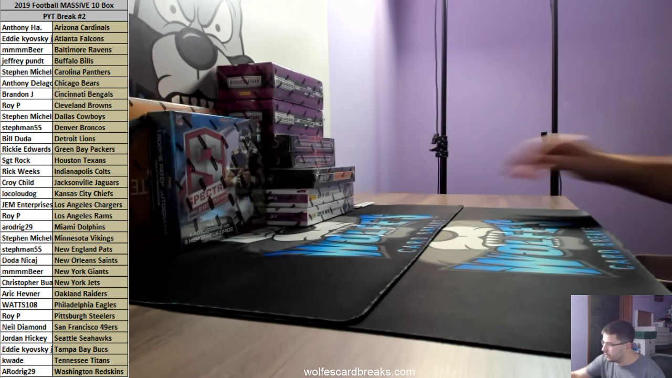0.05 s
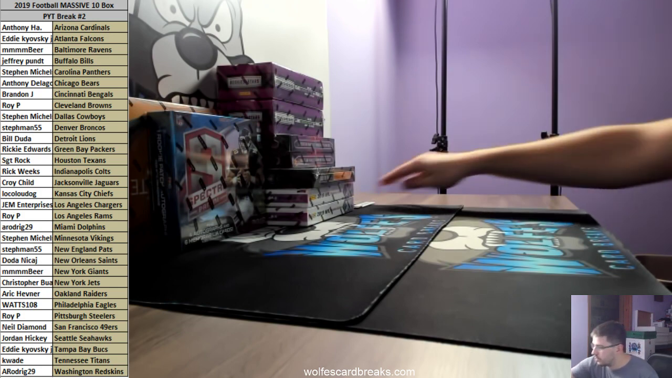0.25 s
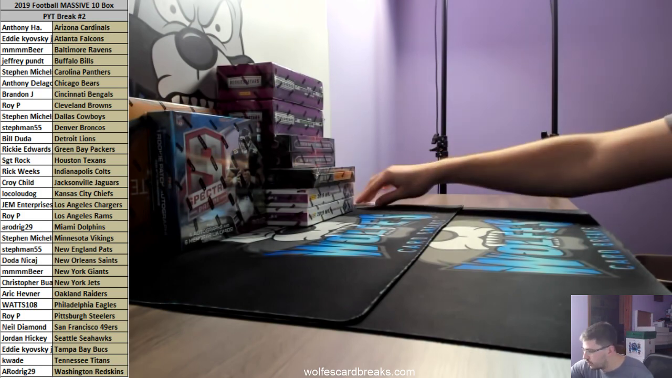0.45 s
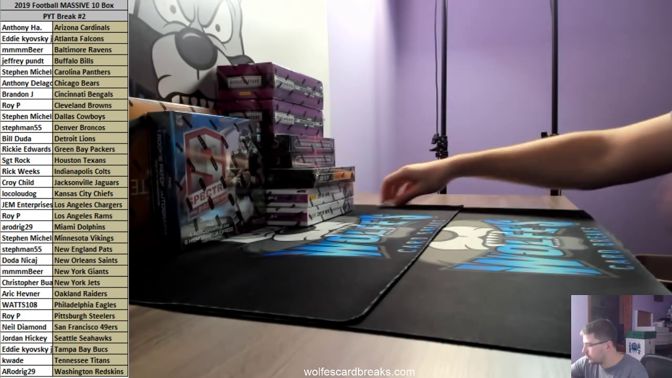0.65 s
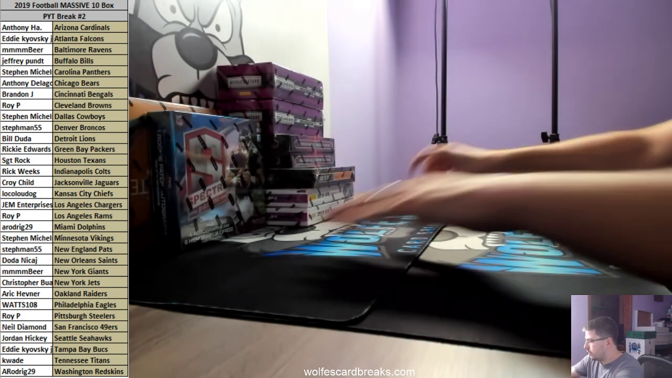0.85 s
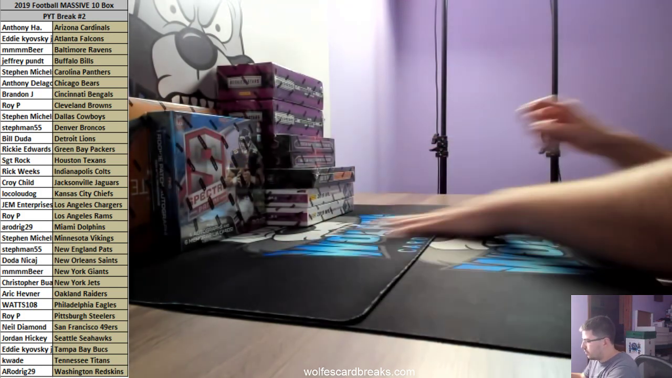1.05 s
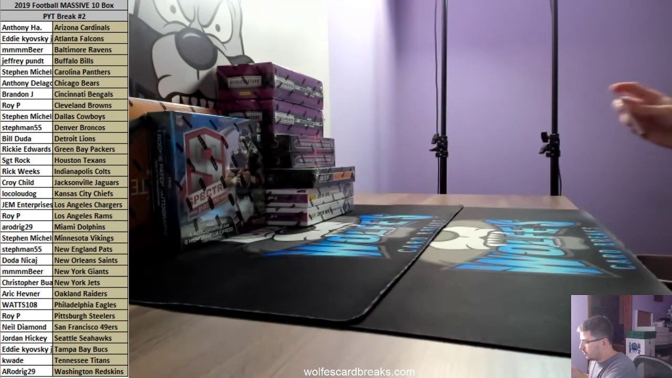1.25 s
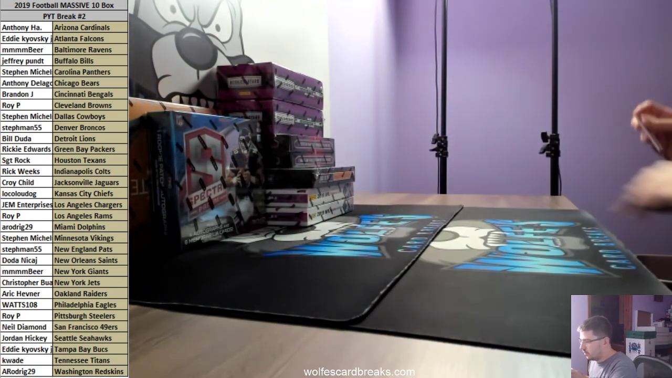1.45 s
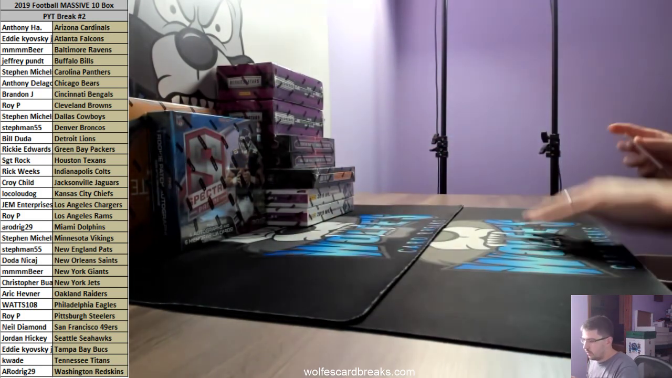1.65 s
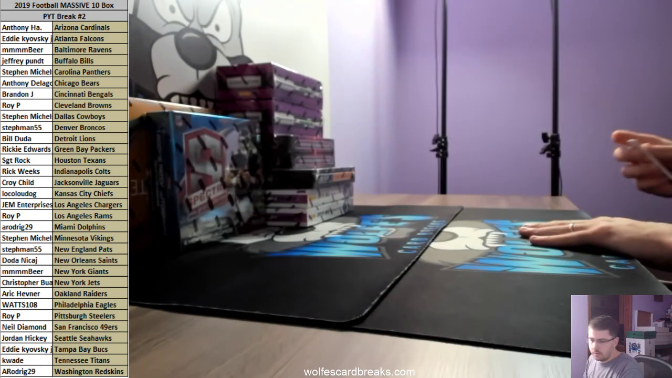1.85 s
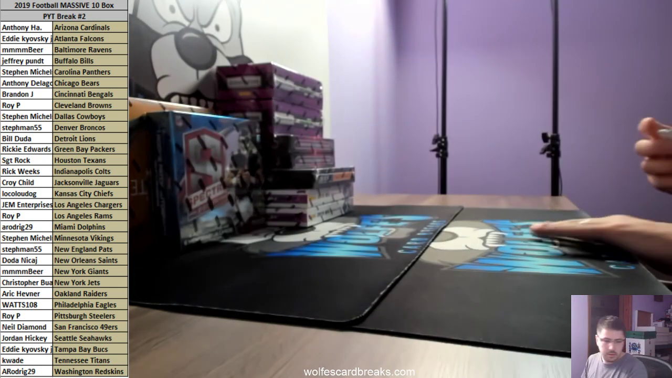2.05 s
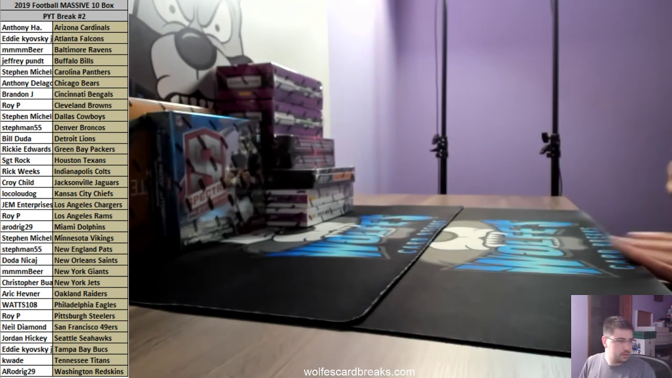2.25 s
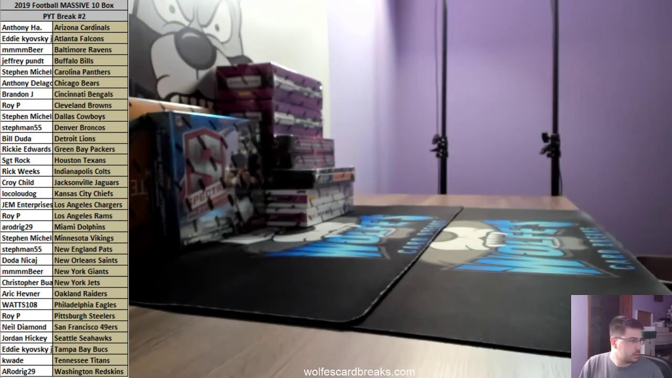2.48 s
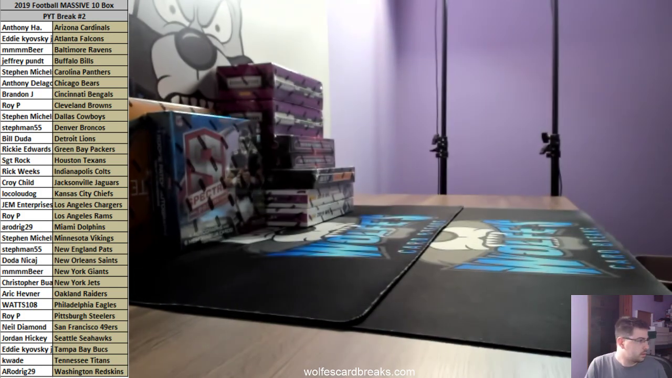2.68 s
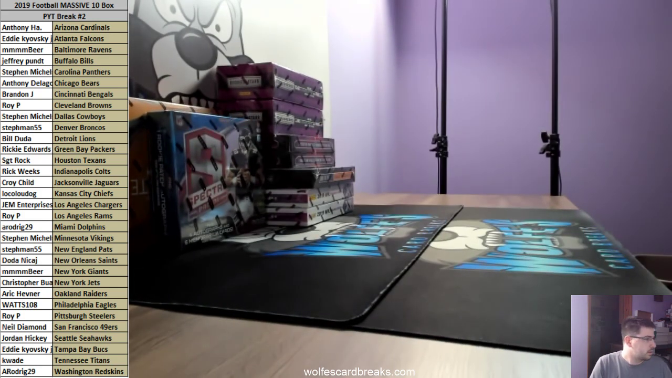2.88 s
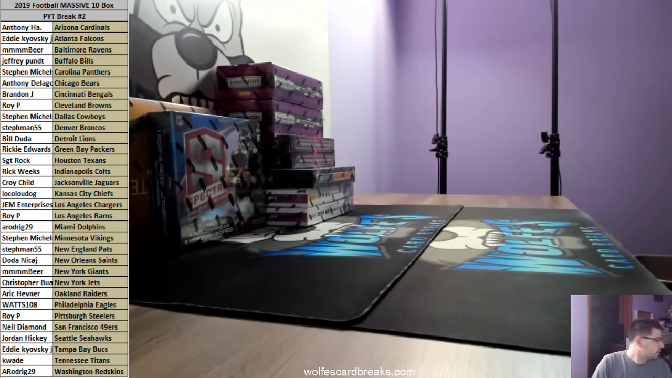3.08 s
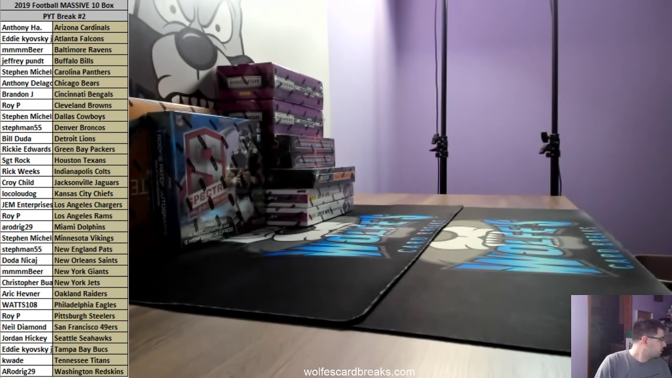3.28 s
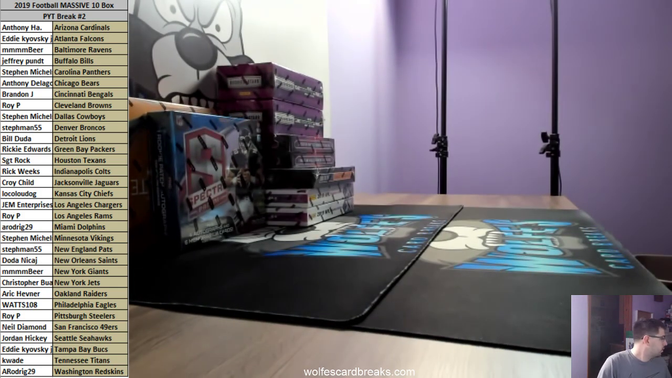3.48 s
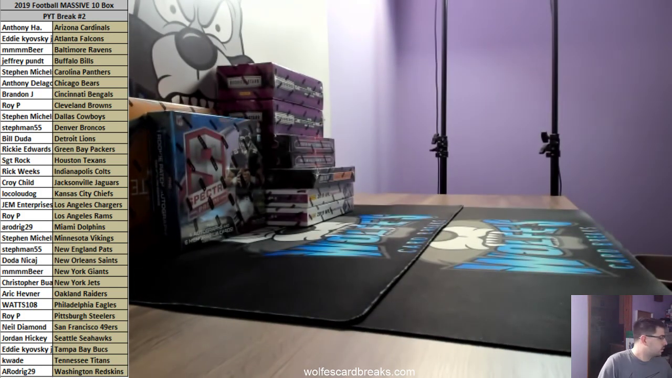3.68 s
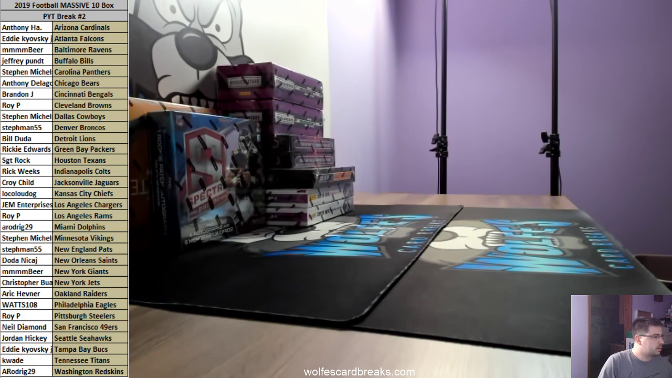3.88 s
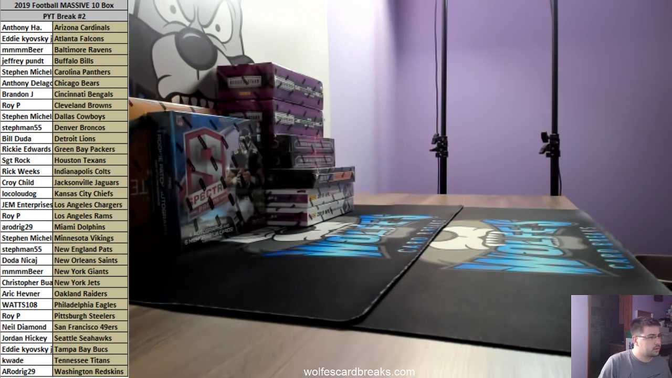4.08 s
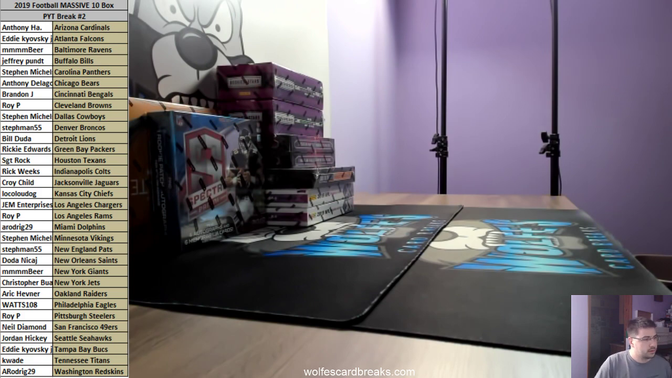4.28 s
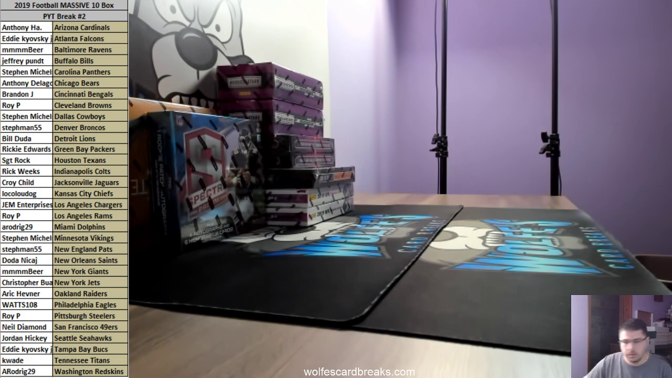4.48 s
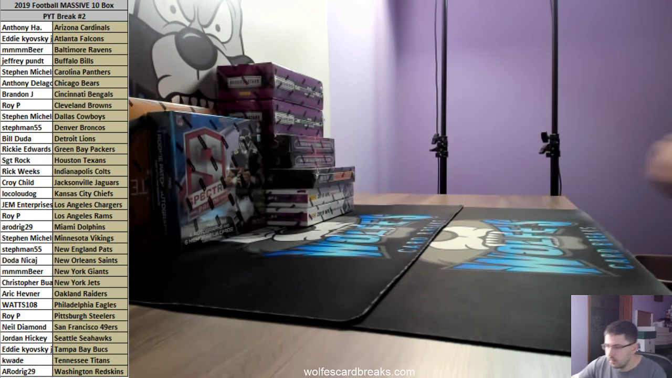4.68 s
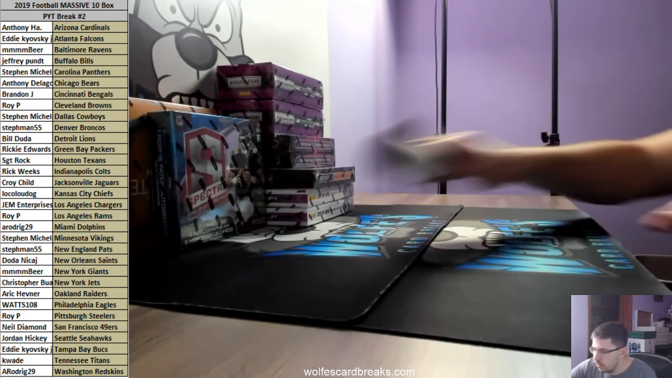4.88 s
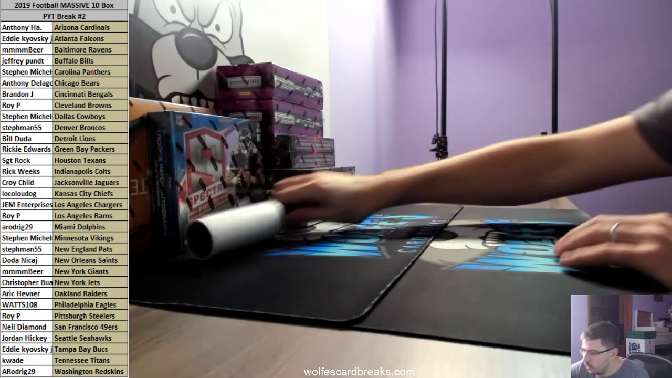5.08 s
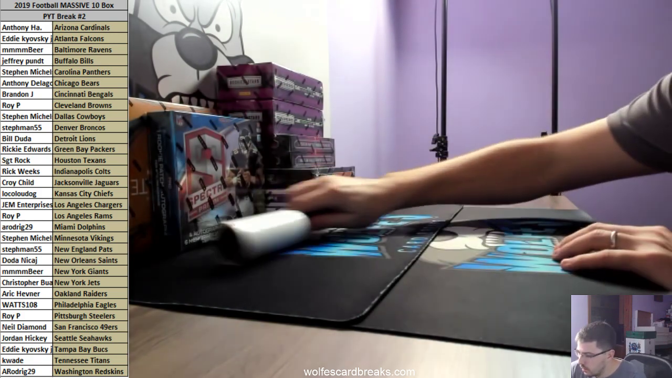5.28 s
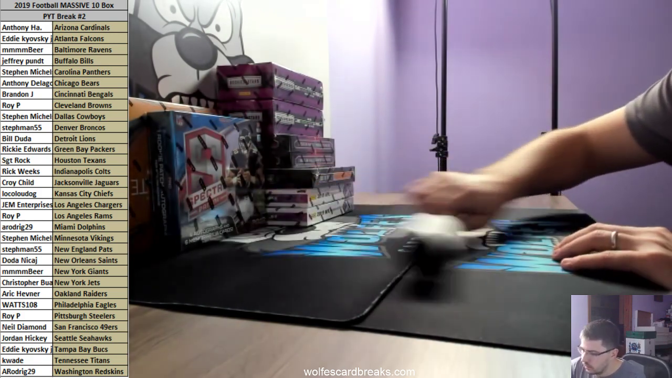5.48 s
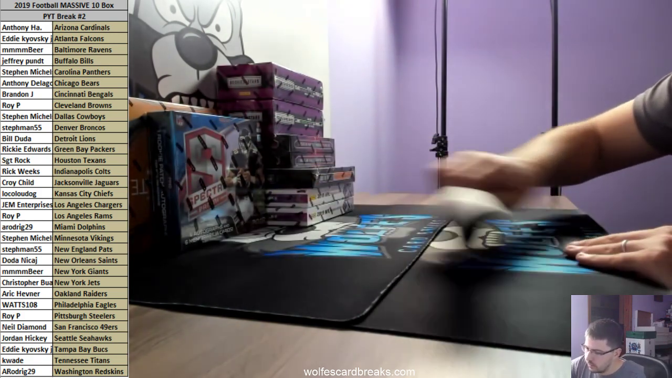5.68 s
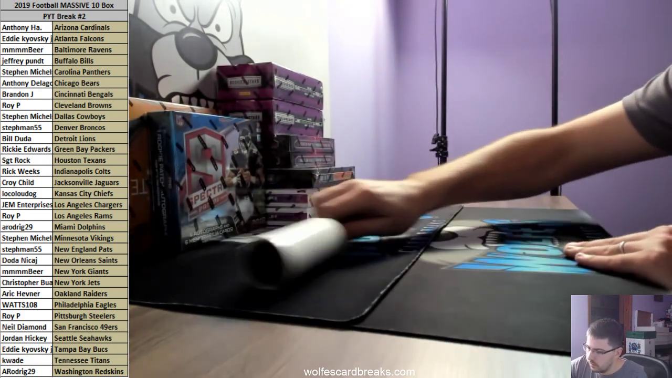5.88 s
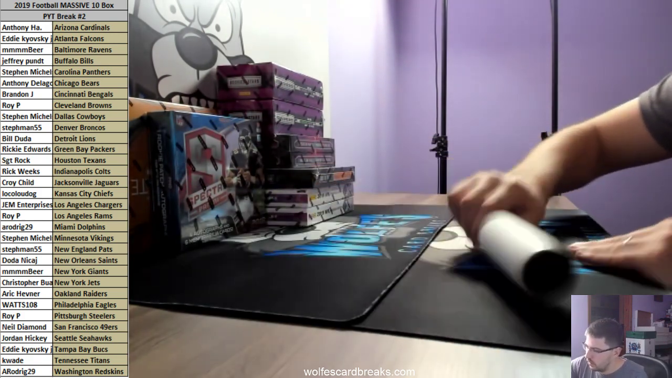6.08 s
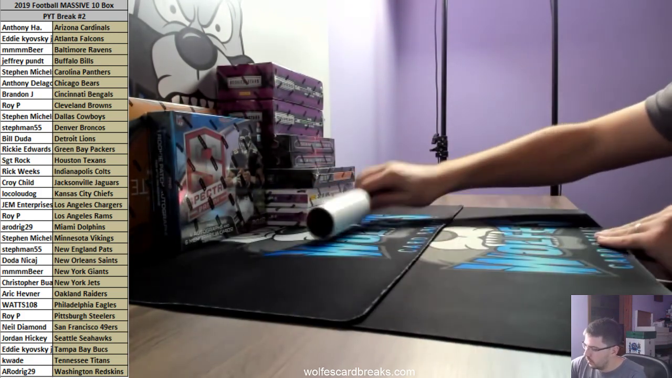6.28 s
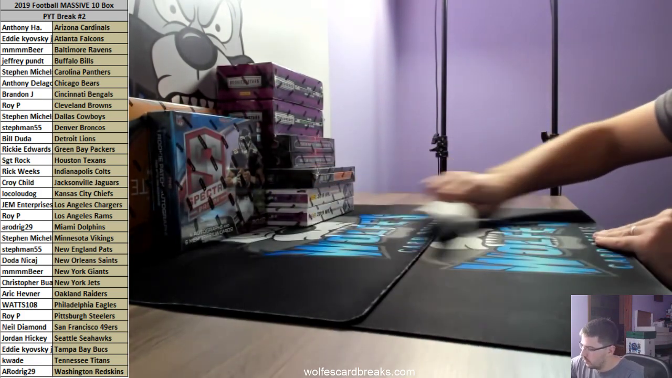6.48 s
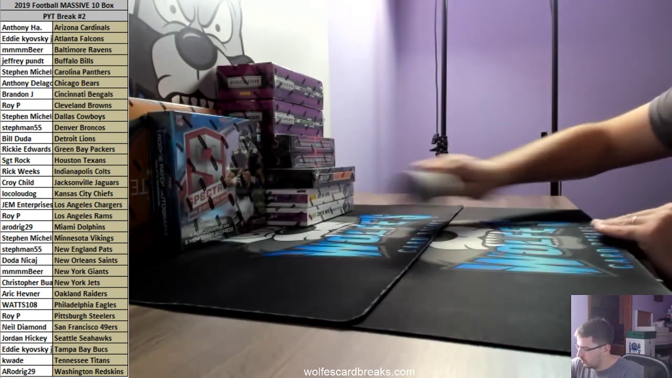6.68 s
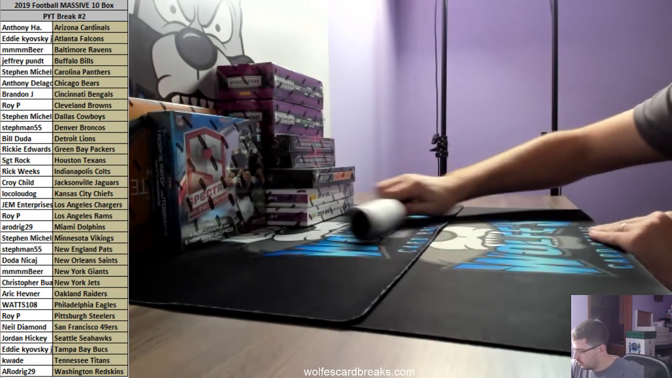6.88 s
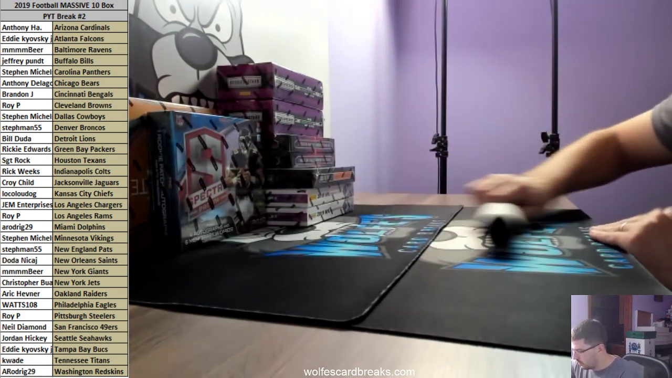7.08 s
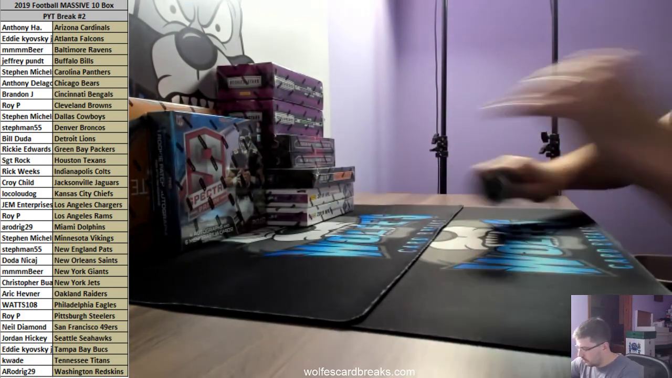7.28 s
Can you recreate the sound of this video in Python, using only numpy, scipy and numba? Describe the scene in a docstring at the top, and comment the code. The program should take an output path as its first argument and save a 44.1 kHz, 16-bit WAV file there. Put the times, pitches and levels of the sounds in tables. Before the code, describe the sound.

Hands brush and knock around on a matted wooden table, then a sticky roller crackles loudly back and forth in four thumping strokes.

```python
"""Sticky roller on a cloth mat

A hand sweeps a cloth mat on a wooden table, things are set down nearby, then a sticky roller lands, peels
along with a dense crackle and bumps over the step between two mats. Roller and hand are random tiny clicks,
coloured and shaped by each stroke; ticks, brushes and hollow knocks are shaped noise. The table is a set of
ringing modes that booms at every bump. One microphone hears it all in a quiet, lightly humming room."""
import sys
import numpy as np
from scipy import signal
from scipy.fft import rfft, irfft, next_fast_len
from scipy.io import wavfile
from numba import njit

SR = 44100
rng = np.random.default_rng(int(sys.argv[2]) if len(sys.argv) > 2 else 0)


def master_out(mix):
    """Clip the mix to full scale and print it as 16-bit PCM to the path in sys.argv[1]."""
    frames = np.transpose(np.atleast_2d(mix))
    ceiling = np.clip(frames, -1, 1)
    pcm = np.round(ceiling * 32767).astype(np.int16)
    wavfile.write(sys.argv[1], SR, pcm)


def amplitude_ratio(level_db):
    """Convert a level in decibels to the matching linear amplitude (field) ratio."""
    exponent = np.asarray(level_db, float) / 20
    return 10 ** exponent


N = 323694   # length in samples


def rms_one(x):
    """Scale to rms 1."""
    return x / np.sqrt(np.mean(x ** 2) + 1e-20)


def in_time(spans, off_db=-110):
    """Join the spans into curves over time; the level column drops to off_db between them."""
    rows = []
    for span in spans:
        first, last = span[0], span[-1]
        rows.append((first[0] - 0.015, off_db, *first[2:]))
        rows.extend(span)
        rows.append((last[0] + 0.015, off_db, *last[2:]))
    s, *columns = np.transpose(rows)
    return [np.interp(np.arange(N) / SR, s, column) for column in columns]


def coloured(x, spectrum):
    """Weight a signal by a spectrum drawn on a log frequency axis, then scale to rms 1."""
    hz, db = np.transpose(spectrum)
    size = next_fast_len(N)
    bin_hz = np.arange(size // 2 + 1) * SR / size
    gain = amplitude_ratio(np.interp(np.log(bin_hz + 1), np.log(hz), db))
    return rms_one(irfft(rfft(x, size) * gain, size)[:N])


def cut(x, hz, kind, order=2):
    """Butterworth filter: "low" keeps what lies below hz, "high" what lies above."""
    sections = signal.butter(order, np.clip(hz, 10, 0.45 * SR), kind, fs=SR, output="sos")
    return signal.sosfilt(sections, x)


def ring(x, hz, t60):
    """Resonator: a unit click sets a sine of height 1 ringing, which falls 60 dB in t60 seconds."""
    decay, turn = amplitude_ratio(-60 / (t60 * SR)), 2 * np.pi * hz / SR
    return signal.lfilter([0, np.sin(turn)], [1, -2 * decay * np.cos(turn), decay ** 2], x + 1e-18)


@njit
def moving_filter(x, hz, damping, sr):
    """State-variable filter with a moving centre: returns band-pass and high-pass."""
    band, high, low, b = np.zeros(len(x)), np.zeros(len(x)), 0., 0.
    for i in range(len(x)):
        f = 2 * np.sin(np.pi * min(max(hz[i], 200.), 6000.) / sr)
        low += f * b
        high[i] = x[i] - low - damping * b
        b += f * high[i]
        band[i] = damping * b
    return band, high


def grains(per_s, spread_db):
    """Random tiny releases of uneven size and sign."""
    sizes = amplitude_ratio(spread_db * np.minimum(rng.exponential(1, N), 5)) * rng.choice([-1, 1], N)
    return sizes * (rng.random(N) < per_s / SR)


def under_stroke(x, level_db, treble_db, split_hz=6000):
    """Friction noise follows the stroke; its treble follows its own lean about the mean."""
    low = cut(x, split_hz, "low")
    lean_db = treble_db - np.average(treble_db, weights=amplitude_ratio(2 * level_db))
    leaned = low + amplitude_ratio(lean_db) * (x - low)
    return amplitude_ratio(level_db) * leaned / np.std(cut(low, 2270, "high"))   # levels refer to the band 2270-6000 Hz


# How far the treble leans before the grip, at the grip, when fastest, at the lift, after the drop and
# after the trail: one value each (treble [dB])
STROKE_TREBLE = (3, -2.5, -0.5, -1.5, -8, -11.5)
# Delay of the echo off the table, at the grip and at the lift: one value each (delay [s])
STROKE_ECHO_LAG = (0.000475, 0.001105)


def stroke(grip_s, grip_db, fast_s, fast_db, lift_s):
    """Grip, speed up, slow down, lift, trail off: rows of (time [s], level [dB], treble [dB], delay [s])."""
    grip_rise_s, grip_rise_db = 0.026, 26
    slow_down_db = 9.5   # loss from fastest to lift
    drop_s, drop_db, trail_s, trail_db = 0.035, 14.5, 0.07, 9.5   # quick drop, then the last threads let go
    halfway_share = 0.7   # share of a swell reached, or of a loss still to come, halfway through

    lift_db = fast_db - slow_down_db
    drop_end_s, drop_end_db = lift_s + drop_s, lift_db - drop_db
    stages = [grip_s - grip_rise_s, grip_s, fast_s, lift_s, drop_end_s, drop_end_s + trail_s]
    s = sorted(stages + [(grip_s + fast_s) / 2, (fast_s + lift_s) / 2])
    db = [grip_db - grip_rise_db, grip_db, grip_db + halfway_share * (fast_db - grip_db), fast_db,
          lift_db + halfway_share * slow_down_db, lift_db, drop_end_db, drop_end_db - trail_db]
    treble_db = np.interp(s, stages, STROKE_TREBLE)
    lag_s = np.interp(s, [grip_s, lift_s], STROKE_ECHO_LAG)   # the echo comes later and later
    return list(zip(s, db, treble_db, lag_s))


# Roller strokes: (grip time [s], level there [dB], fastest time [s], level there [dB], lift time [s])
ROLLER_STROKES = [(5.205, -55.5, 5.5, -39.5, 5.6), (5.89, -44, 5.97, -38.5, 6.06),
                  (6.353, -53.5, 6.49, -44, 6.565), (6.858, -52.5, 7.05, -43.5, 7.18)]
# Colour of the peeling crackle: (frequency [Hz], relative level per hertz [dB])
ROLLER_COLOUR = [(290, -56), (500, -34), (604, -8.5), (1460, -7), (1570, -3), (2290, -2), (5310, -4),
                 (8830, -5), (14000, -11), (16000, 0)]


def roller():
    """Thousands of glue threads snap each second, in clumps; an echo with a growing lag sweeps the colour down."""
    level_db, treble_db, lag_s = in_time([stroke(*row) for row in ROLLER_STROKES])
    clumps = amplitude_ratio(0.94 * rms_one(cut(rng.standard_normal(N), 76, "low")))
    crackle = coloured(clumps * grains(per_s=6000, spread_db=2.5), ROLLER_COLOUR)
    # a harder, faster peel reaches lower
    lowest_hz = np.minimum(900 * amplitude_ratio(0.5 * (level_db.max() - level_db)), 2000)
    crackle = moving_filter(crackle, lowest_hz, 0.92, SR)[1]
    echo = np.interp(np.arange(N) - lag_s * SR, np.arange(N), crackle)
    return under_stroke(crackle + 0.35 * cut(echo, 9900, "low"), level_db, treble_db)


# Loudness of the palm sweeping the mat: (time [s], level [dB])
PALM_SWEEP = [(0.9, -73), (0.92, -55), (0.975, -48.5), (1.05, -46), (1.11, -44.5), (1.15, -47),
              (1.2, -67.5), (1.24, -77)]
# Colour of skin on cloth: (frequency [Hz], relative level per hertz [dB])
PALM_COLOUR = [(290, -76), (500, -40), (1280, -15.5), (1670, -10), (3110, -6), (4470, -10), (7530, -6),
               (12500, -14.5), (16000, -18)]
# Pitch of the hollow under the palm, opening twice: (time [s], frequency [Hz])
PALM_HOLLOW = [(0.94, 1760), (1.005, 4500), (1.06, 2920), (1.15, 4000)]


def sweep():
    """Skin drags over fibres; the hollow under the palm colours the hiss, which brightens as it goes."""
    brighten_db_per_s = 26
    level_db, = in_time([PALM_SWEEP])
    t = np.arange(N) / SR
    start_s, end_s = PALM_SWEEP[0][0], PALM_SWEEP[-1][0]
    treble_db = brighten_db_per_s * (np.clip(t, start_s, end_s) - start_s)
    hiss = coloured(grains(per_s=12000, spread_db=3.0), PALM_COLOUR)
    hollow_hz = np.interp(t, *np.transpose(PALM_HOLLOW))
    hollow = moving_filter(hiss, hollow_hz, 0.3, SR)[0]
    return under_stroke(hiss + 1.3 * hollow, level_db, treble_db)


# Bumps into the table top; the two middle levels are relative to the push:
# (time [s], push [dB], sway [dB], ringing modes [dB], contact [ms])
TABLE_BUMPS = [(0.386, -30.5, -38, -18, 4.9), (0.462, -24.5, -40, -14.5, 3.1), (0.72, -27, -32, -21, 2.8),
               (0.914, -24, -4.5, -23, 3.1), (1.029, -27, 1.5, -41, 4), (1.127, -28, -22, -27, 6),
               (1.714, -30.5, 6.5, -26, 5.1), (1.751, -29, 2.5, -23, 4.1), (2.142, -22, -13, -29, 7.3),
               (2.249, -37, 4.5, -15, 2), (2.867, -21.5, -2, -27.5, 1.3), (3.086, -24, -20, -23.5, 1.3),
               (4.451, -42.5, -14, -5, 0.77), (5.081, -16.5, -17, -20.5, 2.1), (5.108, -22, -4, -12.5, 4.3),
               (5.309, -21, -17, -24, 4.1), (5.338, -28, -33, -1, 5.9), (5.482, -10, -15, -4, 0.95),
               (5.813, -11.5, -21, -11, 2.86), (5.988, -11.5, -23, -6.5, 1.955),
               (6.283, -16, -19, -10.5, 2.74), (6.309, -27.5, -32, -10.5, 2.3),
               (6.483, -7.5, -21, -5, 1.33), (6.741, -24, -26, -32, 3.3), (6.813, -13.5, -20, -8, 3.2),
               (7.0, -12, -16.5, -6, 1.7)]
# Ringing modes of the table top, levels before the final filters:
# (frequency [Hz], level [dB], time to fall 60 dB [s])
TABLE_MODES = [(41.1, -16, 0.56), (63.8, -5, 0.29), (141.3, -8.5, 0.19), (157.5, -14, 0.25),
               (185.85, 6.5, 0.018), (207.2, -6.5, 0.23), (231.7, -6.5, 0.18), (277, 3, 0.084),
               (314.8, -8.5, 0.16), (352.5, -8.5, 0.23), (401, -3.5, 0.098), (459.5, -4.5, 0.046),
               (519.6, 0, 0.046), (678, -16, 0.21), (784, -6.5, 0.058)]
# Weight on the table keeps it swaying: (time [s], level [dB])
TABLE_LEANING = [(0.0, -63), (0.4, -62), (0.8, -55), (1.05, -58), (1.18, -46.5), (1.5, -55.5), (2.5, -56.5),
                 (2.9, -52.5), (3.1, -43), (3.68, -58), (3.85, -62.5), (5.05, -66), (5.25, -43.5),
                 (5.55, -35), (5.7, -42), (6.7, -39), (6.9, -42), (7.34, -45.5)]


def table(friction):
    """Bumps are soft pushes with a shudder behind them; friction drums the top and leaning sways it."""
    t = np.arange(SR // 10) / SR
    shudders = rng.standard_normal((len(TABLE_BUMPS), len(t))) * amplitude_ratio(-29.5 - 60 * t / 0.19)
    pushes = np.zeros((4, N + len(t)))   # one force for each group of modes
    for (s, push_db, sway_db, ringing_db, contact_ms), shudder in zip(TABLE_BUMPS, shudders):
        upper_db = -10.5 + 0.39 * ringing_db   # the upper modes follow the ringing column in part
        width = max(round(contact_ms * SR / 1000), 3)   # samples
        touch = np.hanning(width + 2)[1:-1] * 2 / width   # longer contact, softer push
        force = np.convolve(shudder + (t == 0), touch)[:len(t)]
        group_db = np.array([[sway_db], [0], [ringing_db], [upper_db]])
        at = round(s * SR)
        pushes[:, at:at + len(t)] -= amplitude_ratio(push_db + group_db) * force

    friction_strength = np.sqrt(np.abs(cut(friction ** 2, 14, "low")))
    drumming = amplitude_ratio(-44.5) * friction_strength * rng.standard_normal(N)
    leaning = amplitude_ratio(in_time([TABLE_LEANING])[0]) * rms_one(ring(rng.standard_normal(N), 63.9, 0.22))

    groups = np.zeros((4, N))
    for hz, level_db, t60 in TABLE_MODES:
        group = np.searchsorted([100, 185, 250], hz)   # borders between the groups, Hz
        groups[group] += amplitude_ratio(level_db) * ring(pushes[group, :N] + drumming, hz, t60)
    sway = cut(cut(groups[0], 70.0, "low", order=4), 43, "high")
    ringing = cut(groups[1:].sum(axis=0), 144.7, "high", order=3)
    return ringing + sway + leaning


# Ticks and slaps in the air, ring and treble relative to the body of the tick:
# (time [s], peak [dB], ring frequency [Hz], ring [dB], treble [dB])
AIR_TICKS = [(0.472, -44, 860, 16, -6), (0.518, -38, 1760, 38, -14), (0.864, -50, 3900, 5, -5),
             (1.278, -36.5, 5750, -2, -16), (1.355, -48, 4770, -4, -17), (1.711, -39, 4940, 4, -1),
             (1.773, -47, 960, -2, -22), (2.855, -23.5, 1690, -0.5, -6.5), (2.864, -30, 1080, 2, -25),
             (3.074, -21, 4300, -6, -8.5), (3.083, -24.5, 1042, -3, -27), (3.853, -44, 2600, -1, -13),
             (4.258, -55, 3180, 5, -20), (4.423, -40, 3600, 0, -17), (4.591, -58, 4000, -7, -8),
             (4.651, -52, 1510, 0, -20), (4.682, -47.5, 900, 9, -15), (4.704, -45, 3100, 6, -15),
             (4.767, -57, 2000, -12, -18), (5.082, -25.5, 2080, -25, -15), (5.09, -27, 2580, 5, -10),
             (5.106, -21.5, 1010, 4, -12), (5.191, -32, 3540, -6, -14), (5.203, -34, 4900, -12, -11.5),
             (5.482, -21.5, 2500, -6, -25), (5.603, -31.5, 1727, -4, -24), (5.712, -44.5, 1850, 15, -24.5),
             (5.749, -54, 2000, 2, -20), (5.77, -43, 1950, 3, -30), (5.815, -14.5, 3020, 0.5, 8),
             (5.827, -31, 3300, 23, -13), (5.996, -23.5, 3280, -5, -35), (6.063, -25, 2090, 35, -10),
             (6.077, -30.5, 900, 3, -31), (6.128, -38.5, 2530, 11, -23), (6.196, -44, 2735, 13.5, -15.5),
             (6.258, -34, 2950, -3, -17), (6.287, -27.5, 3400, 12, -13), (6.294, -31, 3400, -10, -14),
             (6.303, -30.5, 2240, -9.5, -11), (6.34, -31, 3470, 11, -12), (6.483, -22.5, 1140, -6, -16),
             (6.737, -44.5, 1140, 2, -23), (6.764, -49, 2980, 7, -17), (6.815, -24, 880, -12, -20),
             (7, -35, 3570, -7, -17), (7.115, -37.5, 879.6, 10, -8), (7.182, -35, 2540, 8, -19),
             (7.244, -51, 880, 11, -22)]


def ticks():
    """Each tick is a click and a dying burst of noise, with a short ring at the pitch of what was touched."""
    out, t = np.zeros(N + SR // 4), np.arange(SR // 4) / SR
    noise = rng.standard_normal((len(AIR_TICKS), len(t)))
    for (s, peak_db, hz, ring_db, treble_db), white in zip(AIR_TICKS, noise):
        # lower, bigger things sound longer, and louder ones too
        length_s = 0.029 * (2000 / hz) ** 0.34 * np.exp(0.0947 * (peak_db + 35))
        click_and_noise = white + 4.9 * (t == 0)
        burst = cut(click_and_noise * amplitude_ratio(-60 * t / max(length_s, 0.003)), 0.17 * hz, "high")
        body = cut(burst, 4650, "low", order=3)
        # the treble fades on top of the burst's own decay
        treble = amplitude_ratio(treble_db - 60 * t / 0.028) * cut(burst, 7200, "high")
        tone = ring(burst * amplitude_ratio(-60 * t / 0.047), hz, 28.0 / hz)   # about the same count of cycles at any pitch
        sound = body + treble + amplitude_ratio(ring_db) * tone * np.std(body) / np.std(tone)
        at = round(s * SR)
        out[at:at + len(t)] += amplitude_ratio(peak_db) * sound / np.abs(sound).max()
    return out[:N]


# Sleeves and fingers brushing; the slow, faint swells are background hiss.
# Rise and fall are the times to or from 20 dB below the top:
# (time of the top [s], level [dB], rise [s], fall [s], treble [dB])
BRUSHES_AND_SWELLS = [(.05, -70.5, 0.34, 0.14, -1), (.55, -71.5, 0.99, 0.29, 3.5),
                      (.52, -60.5, 0.075, 0.1, -14), (0.759, -64.5, 0.074, 0.051, -0.5),
                      (1.288, -64.5, 0.028, 0.067, 6.5), (1.728, -63.5, 0.029, 0.14, 2),
                      (1.93, -63.5, 0.017, 0.023, -12), (2.02, -63.5, 0.069, 0.042, 3.5),
                      (2.15, -57, 0.084, 0.08, 7.5), (2.249, -57, 0.0268, 0.071, 2.5),
                      (2.55, -78, 0.41, 0.51, 3), (2.74, -65.5, 0.057, 0.14, 1),
                      (2.868, -46, 0.0099, 0.06, -4), (3.04, -59.5, 0.049, 0.054, -1.5),
                      (3.088, -47, 0.0097, 0.074, 1), (3.39, -80, 0.69, 0.17, 5),
                      (3.867, -60.5, 0.033, 0.032, -10), (4.44, -69.5, 0.037, 0.19, 5.5),
                      (4.609, -63, 0.036, 0.027, 8.5), (4.67, -61.5, 0.039, 0.03, -2.5),
                      (4.76, -58.5, 0.098, 0.072, 5), (4.92, -71, 0.084, 0.12, 6),
                      (5.118, -43, 0.023, 0.035, -21.5), (5.7, -72, 0.05, 0.23, -3),
                      (7.31, -62, 0.16, 0.12, -1.5)]
# Colour of brushed cloth, lent to the hiss too: (frequency [Hz], relative level per hertz [dB])
BRUSH_COLOUR = [(290, -4), (500, 2), (868, -2), (1260, -8), (1550, -1.5), (3980, -5.5), (8210, -8),
                (16000, -27.5)]


def rustle():
    """Each brush or hiss swells and fades: noise with more or less treble; the duller, the more it rings."""
    cloth = coloured(grains(per_s=12000, spread_db=3.5), BRUSH_COLOUR)
    low, high = cut(cloth, 2700, "low"), cut(cloth, 4740, "high")
    backwards = cloth[::-1]   # serves as a second, unrelated noise
    out, t = np.zeros(N), np.arange(N) / SR
    for s, level_db, rise_s, fall_s, treble_db in BRUSHES_AND_SWELLS:
        ring_hz = min(3350 * amplitude_ratio(0.43 * treble_db), 4000)   # duller ones ring lower
        near = (t > s - 2 * rise_s) & (t < s + 2 * fall_s)
        away = np.where(t[near] < s, (s - t[near]) / rise_s, (t[near] - s) / fall_s)
        ringing = rms_one(ring(backwards[near], ring_hz, 0.0022))
        sound = amplitude_ratio(0.23 * treble_db) * low[near]
        sound += amplitude_ratio(-2.0 - 0.35 * treble_db) * ringing
        sound += amplitude_ratio(treble_db) * high[near]
        out[near] += amplitude_ratio(level_db - 20 * away ** 1.62) * sound
    return out


# Muffled knocks nearby: (time [s], level [dB], time for the push to fall 60 dB [s])
HOLLOW_KNOCKS = [(2.005, -58, 0.26), (2.243, -42.5, 0.34), (2.701, -46.5, 0.27), (2.751, -40, 0.26),
                 (3.862, -49.5, 0.24)]


def knocks():
    """A soft, smeared push of noise sets one hollow mode ringing."""
    hollow_hz, hollow_t60_s = 277.3, 0.079
    t, force = np.arange(N) / SR, np.zeros(N)
    for s, level_db, length_s in HOLLOW_KNOCKS:
        since = np.maximum(t - s, 0)
        force += amplitude_ratio(level_db - 60 * since / length_s) * np.minimum(since / 0.0051, 1)
    white = rng.standard_normal(N)
    steady = ring(white, hollow_hz, hollow_t60_s)
    return ring(force * white, hollow_hz, hollow_t60_s) / np.std(steady)


def room(x):
    """Echoes between the walls: fourteen feedback delays, duller on every round."""
    t60_s, wall_hz = 0.34, 5300   # fall time before the dulling; corner of the dulling
    size = next_fast_len(N + SR)
    w = 2 * np.pi * np.arange(size // 2 + 1) / size
    dull = 1 / (1 + 1j * w * SR / (2 * np.pi * wall_hz))
    echo = 0
    for k, lag_s in enumerate(np.geomspace(0.005, 0.037, num=14)):
        delay = np.exp(-1j * w * round(lag_s * SR))
        one_round = amplitude_ratio(-60 * lag_s / t60_s) * dull ** 0.5 * delay
        echo = echo + (-1) ** k * one_round / (1 - one_round)
    return irfft(rfft(x, size) * echo, size)[:N]


# Colour of still air and microphone hiss: (frequency [Hz], relative level per hertz [dB])
AIR_COLOUR = [(12, -67), (20, -1), (68, -5), (123, -27.5), (142, -3.5), (187, -17.5), (222, 2), (248, -13),
              (277, -17), (422, -19), (678, -19), (923, -26.5), (1290, -27.5), (6360, -43), (16000, -49.5)]
# Wavering hum lines, a wider spread wavering faster: (frequency [Hz], spread [Hz], level [dB])
HUM_LINES = [(166.6, 6.2, -76), (217.7, 1.6, -67), (274, 3.3, -73)]


def room_tone():
    """Still air and microphone hiss are coloured noise; noise in narrow resonators makes the wavering hum."""
    out = amplitude_ratio(-59.5) * coloured(rng.standard_normal(N), AIR_COLOUR)
    for hz, spread_hz, level_db in HUM_LINES:
        out += amplitude_ratio(level_db) * rms_one(ring(rng.standard_normal(N), hz, 5.1 / spread_hz))
    return out


def scene():
    """One microphone feeds both channels."""
    friction = roller() + sweep()
    near = friction + ticks() + rustle()
    echoes = amplitude_ratio(-22) * room(near)
    mono = near + table(friction) + knocks() + echoes + room_tone()
    return np.array([mono, mono])


def top_cut(x):
    """Nothing passes above the cut-off."""
    return signal.sosfilt(signal.butter(12, 16970, fs=SR, output="sos"), x)


def record(dry):
    """A steep low-pass removes the very top of the sound."""
    mix = cut(dry, 15030, "low", order=20)
    return top_cut(mix)


dry = scene()
out = record(dry)
master_out(out)
```